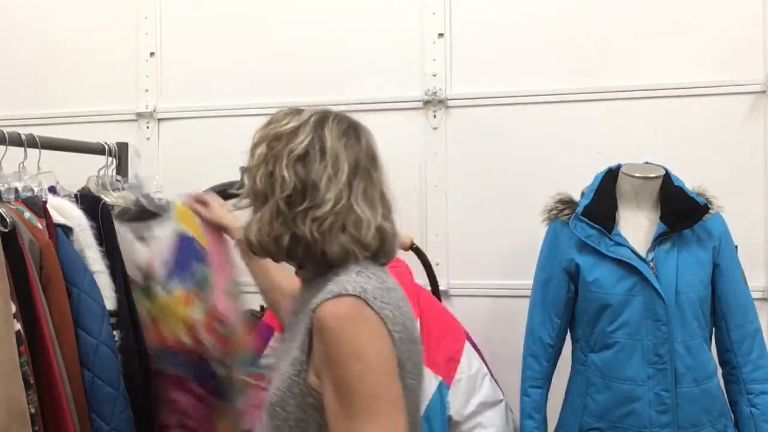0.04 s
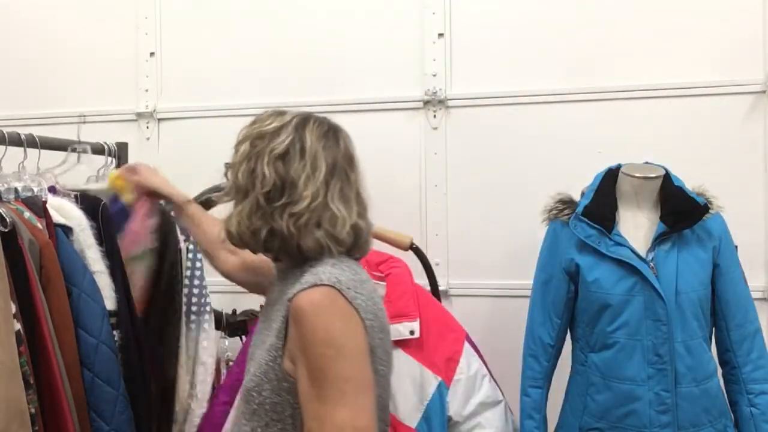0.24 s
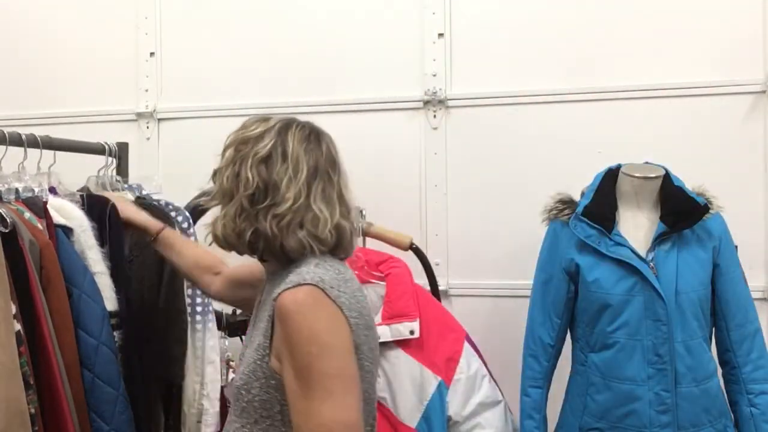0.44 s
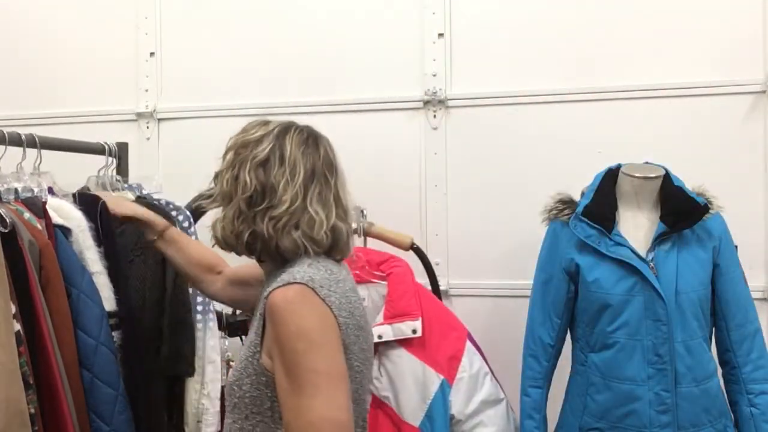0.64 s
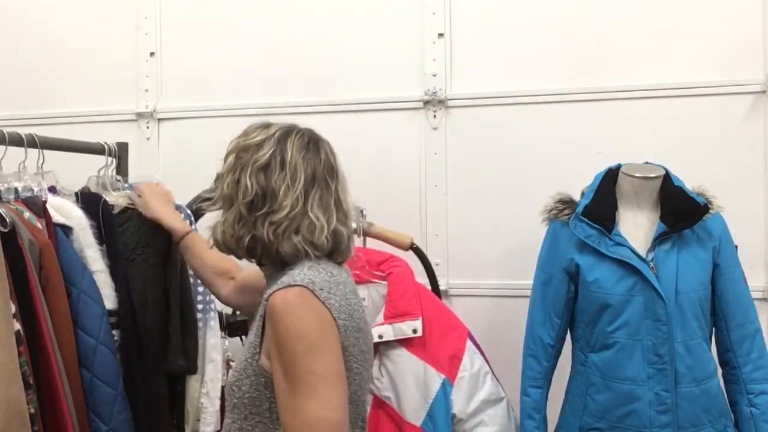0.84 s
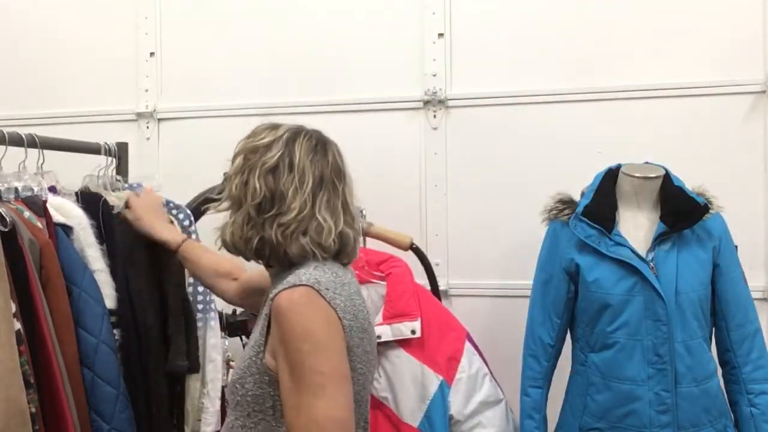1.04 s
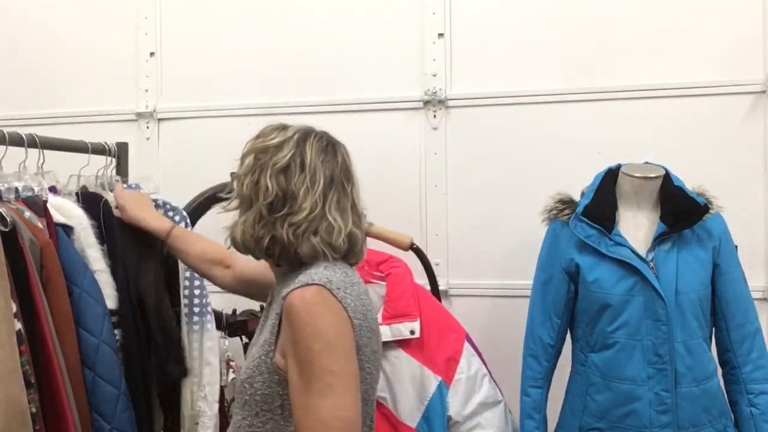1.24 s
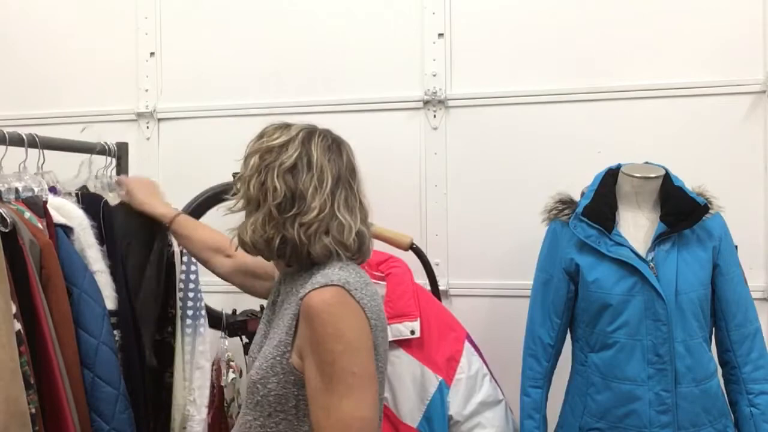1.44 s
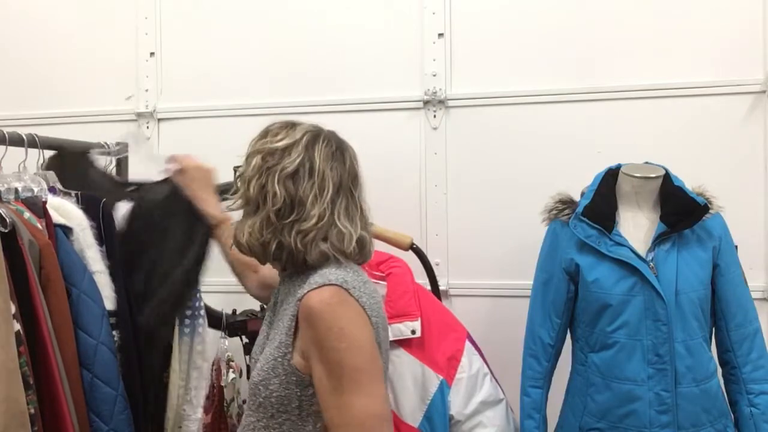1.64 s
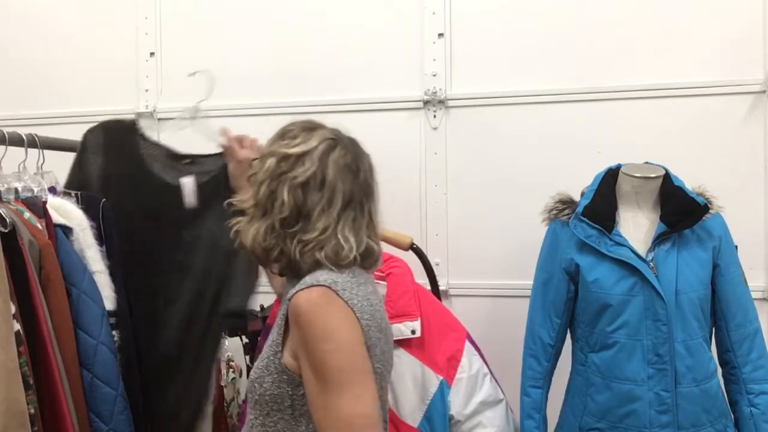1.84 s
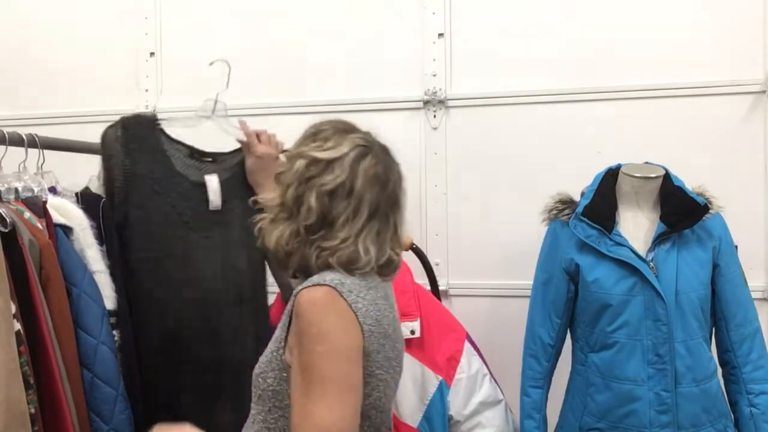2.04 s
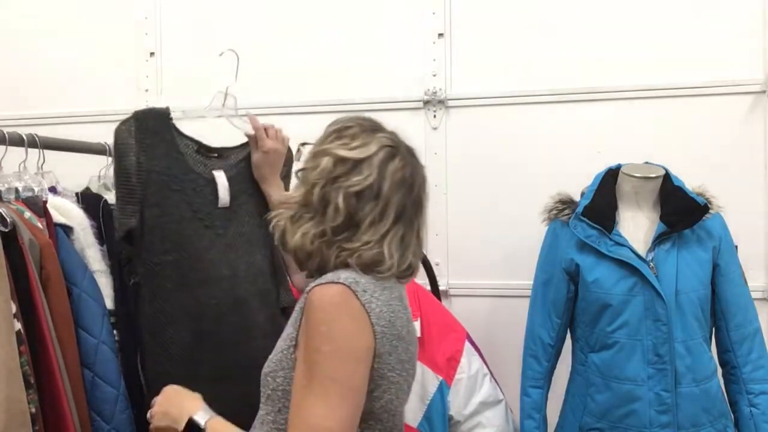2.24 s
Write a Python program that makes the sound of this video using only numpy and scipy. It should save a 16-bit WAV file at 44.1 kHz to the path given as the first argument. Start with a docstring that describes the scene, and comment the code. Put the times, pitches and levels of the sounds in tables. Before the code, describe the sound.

Clothes hangers clatter onto a steel rail, followed by a thin sliding squeal and light clicks.

```python
"""A plastic hanger clacks against its neighbours: each hit is a noise crack plus ringing modes.
Its wire hook drops onto a steel clothes rail with a clink; garments brush past each other.
Another hook is dragged along the rail with a thin stick-slip squeal and lifted off with light knocks.
A bare, hard-walled shop room rings after each sound, over low rumble, hum, one soft boom and hiss."""
import sys
import numpy as np
from scipy import signal
from scipy.fft import rfft, irfft
from scipy.io import wavfile

SR = 44100
rng = np.random.default_rng(int(sys.argv[2]) if len(sys.argv) > 2 else 0)


def wav_out(sig):
    """Save sig, one row per channel (or a flat mono array), as 16-bit PCM at SR to the path in sys.argv[1]."""
    wavfile.write(sys.argv[1], SR, np.round(np.clip(np.atleast_2d(sig).T, -1, 1) * 32767).astype(np.int16))


N = 101429

# hanger hits: start_s, level_db, tilt_db_per_oct, crack_t60_s, body_hz, falloff_db_per_oct
KNOCKS = [(0.12, -54, -4.5, 0.026, 4100, 10), (0.2339, -23, 0.5, 0.036, 1500, -0.33),
          (0.2457, -31, -2.5, 0.026, 3170, 2), (0.3549, -30.5, 6, 0.069, 3600, 7),
          (0.5512, -46, -2.5, 0.034, 3180, 14), (0.695, -67, -1.5, 0.059, 1580, 6.5),
          (1.025, -66.5, -3.5, .02, 6600, 5), (1.3453, -53.5, 0.5, 0.098, 3360, -5),
          (1.38, -59.5, -3.5, 0.076, 1900, 0.5), (2.198, -69.5, -11, 0.057, 955, 11.5)]
# plastic hanger modes: freq_hz, level_db, t60_s
HANGER_MODES = [(335.5, -26.5, 0.58), (606.5, -13, 0.14), (810, -13, 0.18), (1095, -6.5, 0.11),
                (1295, -3.5, 0.036), (1735, -12.5, 0.3), (1975, -4.5, 0.13), (2206, -7, .1),
                (2500, -4.5, 0.098), (2766, -0.5, 0.071), (3354, -5.5, 0.061), (3757, -3, 0.073),
                (4034, -1, .08), (4545, -2, 0.095), (5670, 3.5, 0.069), (6520, -4, 0.11)]
# plastic contact spectrum: freq_hz, density_db
CRACK_SPECTRUM = [(100, -33), (330, -22), (470, -26), (650, -12.5), (900, -14), (1350, -3.5), (3500, -2),
                  (6000, -1.5), (8000, -2.5), (11500, -5.5), (15500, -13.5)]
KNOCK_RISE_S, HANGER_RING_DB = 0.0051, -7

# hook drop on the rail: start_s, level_db
LANDINGS = [(0.354, -27)]
# hook and rail modes: freq_hz, level_db, t60_s
RAIL_MODES = [(3575, -21.5, .45), (3782, -5, 0.16), (4210, -6, 0.22), (4452, 0, .2), (4500, -11, 0.5),
              (5980, -15.5, 0.22), (7135, -3, .07), (9110, -8, .17), (11200, -7, 0.11), (11900, -13, 0.16),
              (15055, -12, 0.18)]
# steel contact spectrum: freq_hz, density_db
CLINK_SPECTRUM = [(1000, -9), (2500, -8), (4000, 6.5), (6500, -3), (7800, -4.5), (9000, 6.5), (10000, -14),
                  (11500, -1.5), (15500, -7.5)]
LANDING_RISE_S, RAIL_RING_DB, SHIMMER_DB = 0.0052, -10.5, -11.5

# squeal envelope: time_s, level_db
SQUEAL_LEVEL = [(1.065, -84), (1.09, -59), (1.13, -41), (1.141, -30.5), (1.15, -26.5), (1.16, -38),
                (1.182, -46.5), (1.194, -28), (1.208, -31), (1.222, -36.5), (1.239, -42), (1.25, -63),
                (1.293, -69), (1.32, -68)]
# squealing mode: time_s, pitch_hz
SQUEAL_PITCH = [(1.129, 8950), (1.159, 8954)]
# hook chatter: time_s, slip_rate_hz, level_db
CHATTER = [(1.055, 880, -78.5), (1.097, 975, -67.5), (1.137, 950, -72.5), (1.151, 1160, -68),
           (1.186, 1205, -69), (1.205, 1000, -82.5)]
# chatter harmonics, first upward: level_db
CHATTER_HARMONICS_DB = [-0.5, -1.5, 4, -3, -7]
# squeal sidebands, nearest first: level_db
UPPER_SIDES_DB, LOWER_SIDES_DB = [-1, -4.5, -15], [-3, -8, -16]
# sidebands under the squeal's octave, from two chatter rates down: level_db
OCTAVE_SIDES_DB = [-5, -12, -16.5]
# sideband and grit envelope: time_s, level_db
RASP_LEVEL = [(1.07, -85), (1.133, -66.5), (1.147, -49.5), (1.182, -52), (1.2, -57), (1.245, -65),
              (1.29, -78.5)]
# brief hook slips: start_s, pitch_hz, level_db, t60_s
SLIPS = [(0.765, 9458, -67, 0.24), (1.038, 7250, -74.5, 1), (1.347, 5390, -56, 0.16),
         (1.349, 13300, -63, 0.22)]
CHATTER_JITTER, GRIT_DB, SLIP_WOBBLE_HZ, SLIP_SETTLE_S = 0.02, -7, 230, 0.035

# cloth envelope: time_s, level_db
CLOTH_LEVEL = [(0, -68), (0.09, -81.5), (0.21, -70), (0.3, -70.5)]
# cloth spectrum: freq_hz, density_db
CLOTH_SPECTRUM = [(300, 1), (1000, -2), (2700, 0.5), (6000, -6.5), (14000, -19.5)]

# room decay: freq_hz, t60_s
ROOM_T60 = [(200, 0.93), (1000, 0.41), (4000, 0.7), (8500, 0.5), (15000, 0.57)]
PREDELAY_S, EARLY_DB, TAIL_DB = 0.011, -9.5, -9
RING_SEND_DB, SLIDE_SEND_DB = -11.5, -6.5

# rumble spectrum before its low-pass: freq_hz, density_db
RUMBLE_SPECTRUM = [(25, -39), (40, -18), (58, -5), (72, 0.5), (95, -14), (120, -2.5), (160, -0.5),
                   (210, -11), (300, -15), (480, -17.5)]
# rumble envelope: time_s, level_db
RUMBLE_LEVEL = [(0, -63.5), (0.42, -61.5), (0.6, -66.5), (0.8, -65), (1.4, -68.5), (2.3, -67.5)]
# low boom: time_s, pitch_hz, level_db
BOOM = [(1.68, 121.3, -69.5), (1.77, 125.6, -61), (1.86, 147.8, -58), (1.91, 146.4, -79)]
# hiss spectrum: freq_hz, density_db
HISS_SPECTRUM = [(260, -43.5), (450, -9), (633, -4), (1080, -5), (3970, -7.5), (15500, -17.5)]
HUM_HZ, HUM_DB, HISS_DB, CUTOFF_HZ = 114.7, -74.5, -75, 15750


def hanger_knocks():
    """Plastic hits: a crack coloured by the hanger's modes and the hit point, then the arms ring."""
    cracks, rings = 0, 0
    peaks_db = 5.5 * np.max([resonance(hz, width_hz=75) for hz, _, _ in HANGER_MODES], axis=0)
    for start_s, db, tilt, t60_s, body_hz, falloff in KNOCKS:
        body = undb(peaks_db - falloff * np.abs(np.log2(freqs() / body_hz)))
        crack = noise(colour(CRACK_SPECTRUM, tilt) * body)
        cracks += undb(db) * crack * strike(seconds() - start_s, KNOCK_RISE_S, t60_s)
        modes = [(hz, mode_db - falloff * abs(np.log2(hz / body_hz)), ring_s)
                 for hz, mode_db, ring_s in HANGER_MODES]
        rings += undb(db + HANGER_RING_DB) * ring(modes, start_s, KNOCK_RISE_S, tilt)
    return cracks, rings


def hook_landing():
    """Wire hits steel tube: a bright clink, a few clear modes and a shimmer of dense high ones."""
    clinks, rings = 0, 0
    for start_s, db in LANDINGS:
        age_s = seconds() - start_s
        clinks += undb(db) * noise(colour(CLINK_SPECTRUM)) * strike(age_s, LANDING_RISE_S, t60_s=0.023)
        shimmer = noise(colour(CLINK_SPECTRUM, tilt_db_per_oct=0.5))
        rings += undb(db + SHIMMER_DB) * shimmer * strike(age_s, LANDING_RISE_S, t60_s=0.34)
        rings += undb(db + RAIL_RING_DB) * ring(RAIL_MODES, start_s, LANDING_RISE_S)
    return clinks, rings


def hook_sliding():
    """Stick-slip locks onto one high mode; a slower chatter buzzes and puts sidebands around it."""
    squeal_hz = np.interp(seconds(), *np.array(SQUEAL_PITCH).T) + 12 * wander(150)
    squeal = tone(squeal_hz) * fader(SQUEAL_LEVEL) * undb(0.71 * wander(290))
    time_s, rate_hz, db = np.array(CHATTER).T
    chatter_hz = np.interp(seconds(), time_s, rate_hz) * (1 + CHATTER_JITTER * wander(200))
    chatter = unit_rms(rough_tones(0, chatter_hz, CHATTER_HARMONICS_DB)) * fader(np.c_[time_s, db])
    sides = rough_tones(squeal_hz, chatter_hz, UPPER_SIDES_DB)
    sides += rough_tones(squeal_hz, -chatter_hz, LOWER_SIDES_DB)
    sides += rough_tones(2 * squeal_hz - chatter_hz, -chatter_hz, OCTAVE_SIDES_DB)
    grit = undb(GRIT_DB) * noise(colour([(6500, -2), (9000, 12), (15500, -1)]))
    rasp = (unit_rms(sides) + grit) * fader(RASP_LEVEL) * undb(2 * wander(300))
    return squeal + chatter + rasp


def hook_slips():
    """Brief slips: pings that start rough and settle into a clean ring."""
    pings = 0
    for start_s, hz, db, t60_s in SLIPS:
        age_s = seconds() - start_s
        wobble_hz = SLIP_WOBBLE_HZ * wander(300) * np.exp(-np.abs(age_s) / SLIP_SETTLE_S)
        pings += undb(db) * tone(hz + wobble_hz) * strike(age_s, 0.0014, t60_s)
    return pings


def garments():
    """Cloth brushes on cloth: soft, uneven noise."""
    return noise(colour(CLOTH_SPECTRUM)) * fader(CLOTH_LEVEL) * undb(0.83 * wander(60))


def room(send):
    """Early wall reflections and a diffuse octave-band tail, longest in the bass."""
    age_s = seconds() - PREDELAY_S
    centres_oct = np.log2(125) + np.arange(8)
    white, tail = rfft(rng.standard_normal(N)), 0
    for centre, weights in zip(centres_oct, np.eye(8)):
        band = irfft(white * np.interp(np.log2(freqs()), centres_oct, weights), N)
        tail += band * strike(age_s, rise_s=0.013, t60_s=log_interp(ROOM_T60, 2 ** centre))
    early = rng.standard_normal(N) * strike(age_s, rise_s=0.0013, t60_s=0.14)
    response = (undb(TAIL_DB) * unit_rms(tail) + undb(EARLY_DB) * unit_rms(early)) / np.sqrt(N)
    return signal.fftconvolve(send, response)[:N]


def background():
    """Low rumble, wavering hum, one swelling boom, faint hiss."""
    rumble = noise(colour(RUMBLE_SPECTRUM) * lowpass(520)) * fader(RUMBLE_LEVEL)
    rumble *= undb(1.2 * wander(6.2))
    hum = tone(HUM_HZ + 1.5 * wander(1.4)) * undb(HUM_DB + 2 * wander(6.8))
    time_s, hz, db = np.array(BOOM).T
    boom = tone(np.interp(seconds(), time_s, hz) + 4 * wander(22)) * fader(np.c_[time_s, db])
    hiss = undb(HISS_DB) * noise(colour(HISS_SPECTRUM))
    return rumble + hum + boom + hiss


def ring(modes, start_s, rise_s, tilt_db_per_oct=0):
    """Struck modes: decaying sines of random phase, total power normalised."""
    hz, db, t60_s = np.array(modes).T[:, :, None]
    gain = undb(db + tilt_db_per_oct * np.log2(hz))
    age_s = np.arange(SR // 2) / SR
    waves = np.sin(2 * np.pi * (hz * age_s + rng.random(hz.shape))) * strike(age_s, rise_s, t60_s)
    sound = (gain * waves).sum(0) / np.sqrt(np.sum(gain ** 2) / 2)
    return np.concatenate([np.zeros(int(start_s * SR)), sound, np.zeros(N)])[:N]


def rough_tones(base_hz, step_hz, levels_db):
    """Evenly spaced fluttering tones, from one step off the base."""
    return sum(undb(db) * tone(base_hz + k * step_hz) * (1 + 1.2 * wander(170))
               for k, db in enumerate(levels_db, 1))


def tone(hz):
    """Unit-rms sine on a moving pitch."""
    return np.sqrt(2) * np.sin(2 * np.pi * np.cumsum(hz) / SR)


def noise(bin_gain):
    """Unit-rms shaped noise."""
    return unit_rms(irfft(rfft(rng.standard_normal(N)) * bin_gain, N))


def wander(rate_hz):
    """Smooth unit-rms random drift."""
    return noise(lowpass(rate_hz))


def strike(age_s, rise_s, t60_s):
    """Linear rise, exponential decay."""
    return np.clip(age_s / rise_s, 0, 1) * np.exp(-np.log(1000) * np.maximum(age_s - rise_s, 0) / t60_s)


def fader(points):
    """Gain from (time_s, level_db) points, silent outside them."""
    return undb(np.interp(seconds(), *np.array(points).T, left=-200, right=-200))


def colour(points, tilt_db_per_oct=0):
    """Bin gains from (freq_hz, density_db); tilt above the second point, roll-off below the first."""
    hz = freqs()
    tilt_db = tilt_db_per_oct * np.log2(np.maximum(hz, points[1][0]))
    return undb(log_interp(points, hz) + tilt_db) * np.minimum(hz / points[0][0], 1) ** 2


def resonance(hz, width_hz):
    """Bin gains of one peak, 1 at its centre."""
    return 1 / (1 + (2 * (freqs() - hz) / width_hz) ** 2)


def lowpass(corner_hz):
    """Bin gains of a fourth-order roll-off."""
    return 1 / (1 + (freqs() / corner_hz) ** 4)


def log_interp(points, hz):
    """Interpolate (freq_hz, value) points over log frequency."""
    point_hz, values = np.array(points).T
    return np.interp(np.log(hz), np.log(point_hz), values)


def undb(db):
    """Decibels to gain."""
    return 10 ** (np.asarray(db) / 20)


def unit_rms(x):
    """Scale to rms 1."""
    return x / np.sqrt(np.mean(x ** 2))


def seconds():
    """Sample times."""
    return np.arange(N) / SR


def freqs():
    """Bin frequencies, at least 1 Hz."""
    return np.maximum(np.arange(N // 2 + 1) * SR / N, 1)


def scene():
    """Mono mix; rings and sliding excite the room less than cracks and cloth."""
    cracks, rings = np.add(hanger_knocks(), hook_landing())
    slide = hook_sliding() + hook_slips()
    cloth = garments()
    reflections = room(cracks + cloth + undb(RING_SEND_DB) * rings + undb(SLIDE_SEND_DB) * slide)
    return (cracks + rings + slide + cloth + reflections + background())[None]


def record(dry):
    """Steep elliptic low-pass on the top treble."""
    return signal.sosfilt(signal.ellip(10, 0.2, 80, CUTOFF_HZ, fs=SR, output="sos"), dry)


dry = scene()
out = record(dry)
wav_out(out)
```